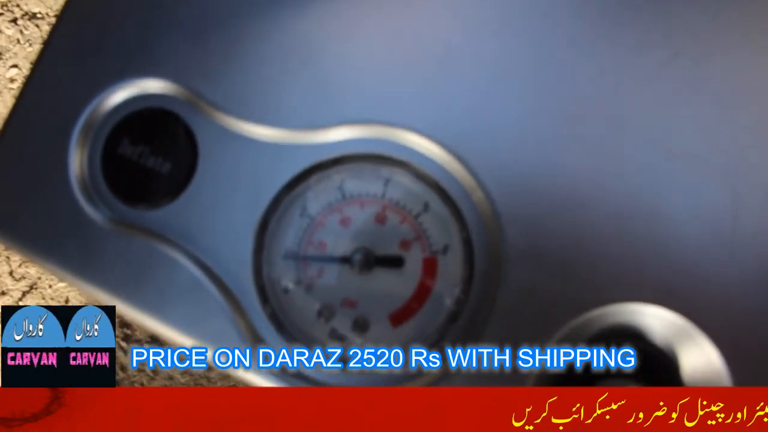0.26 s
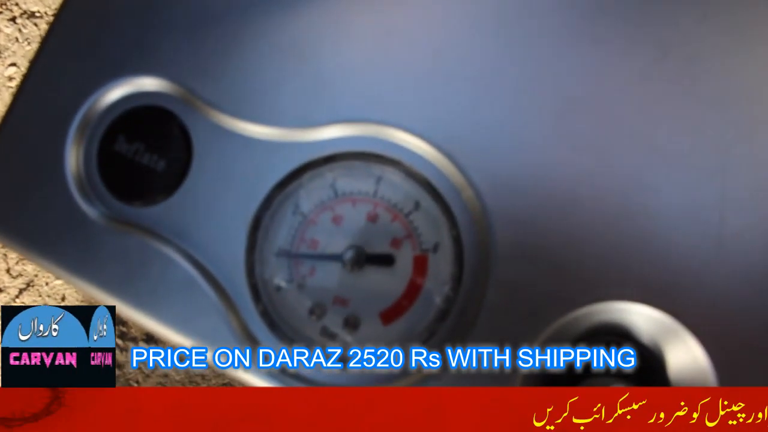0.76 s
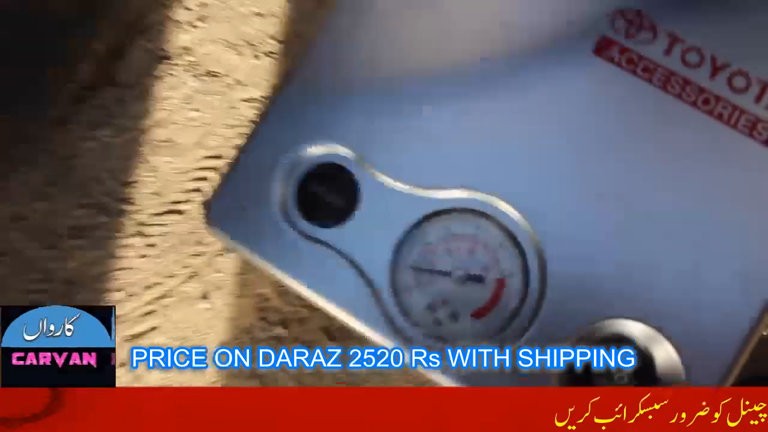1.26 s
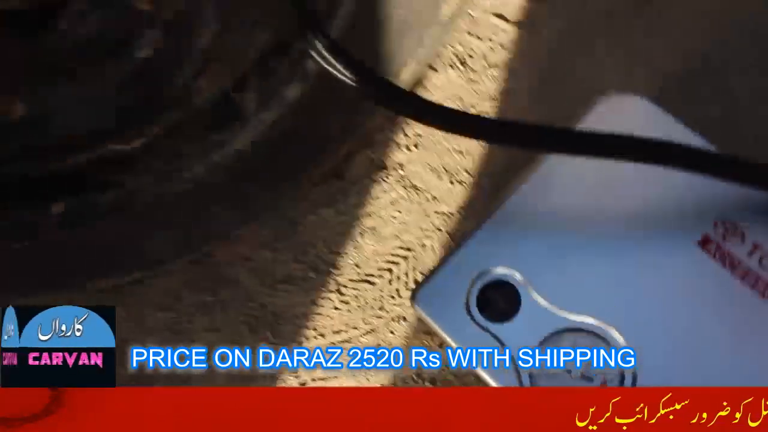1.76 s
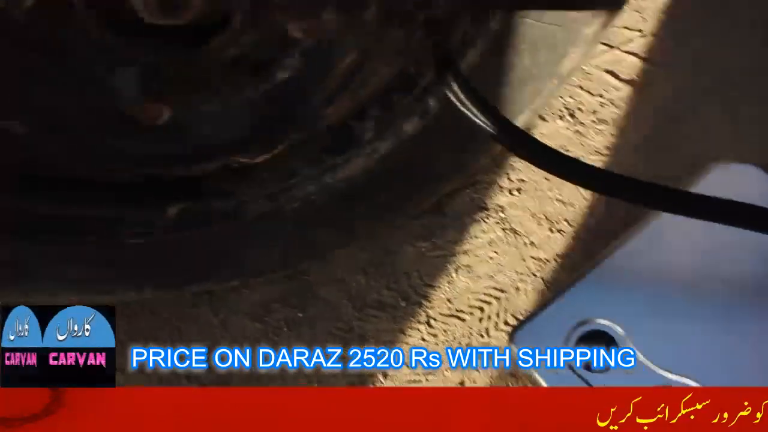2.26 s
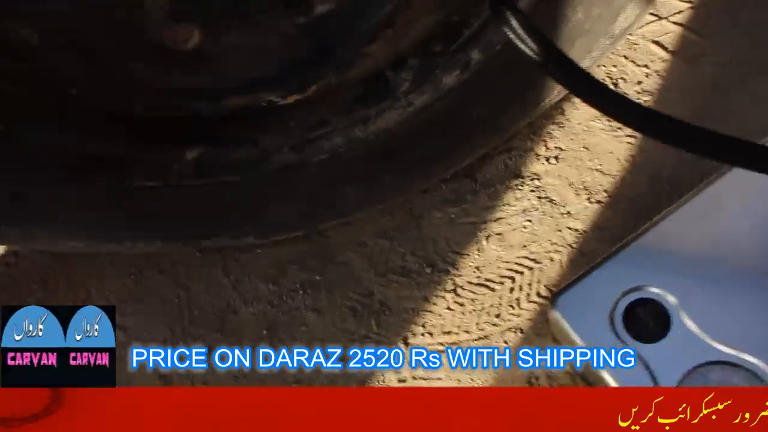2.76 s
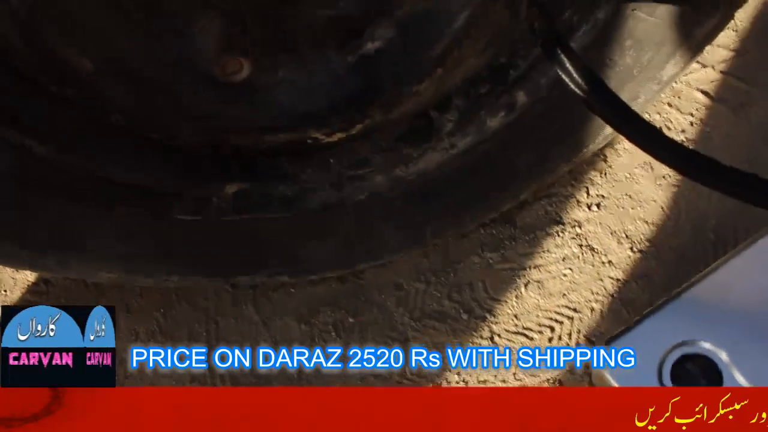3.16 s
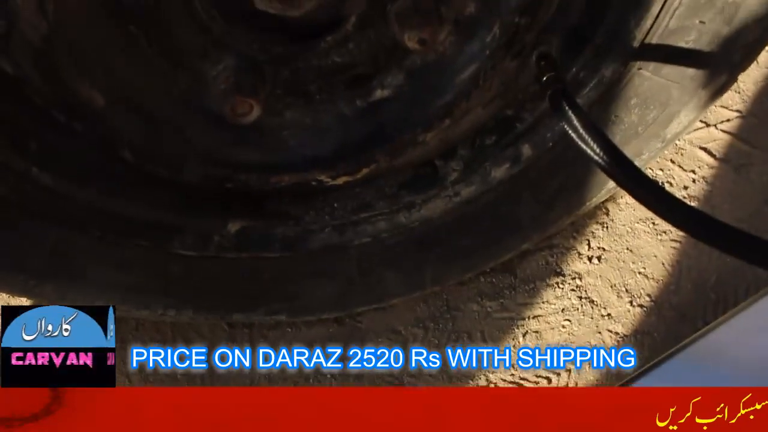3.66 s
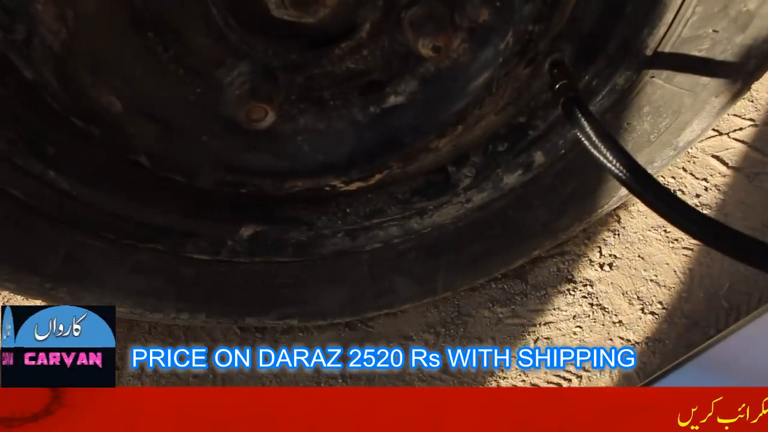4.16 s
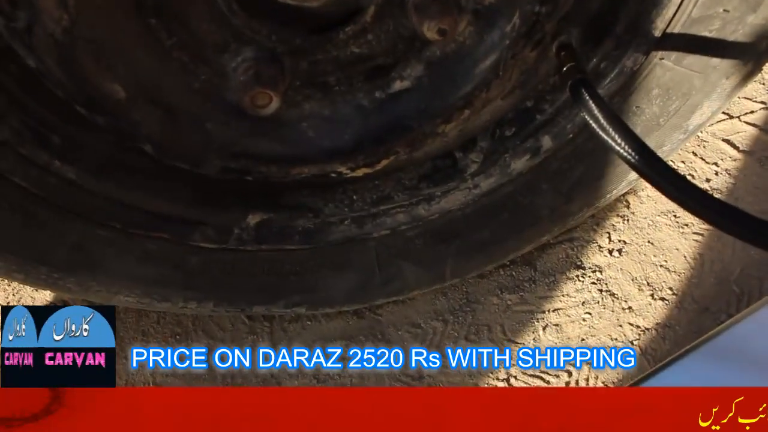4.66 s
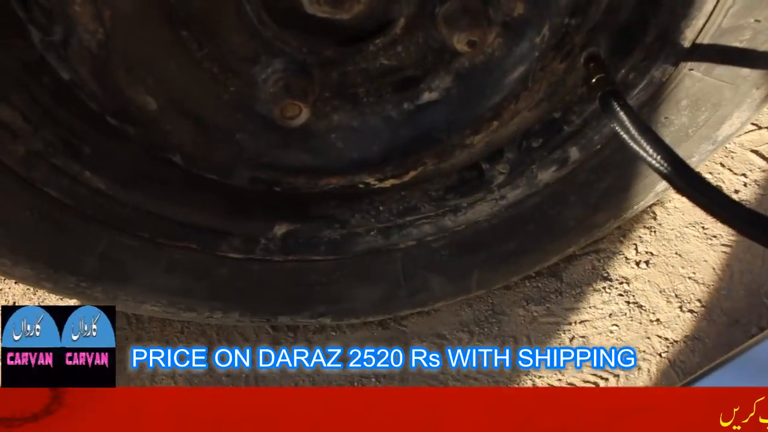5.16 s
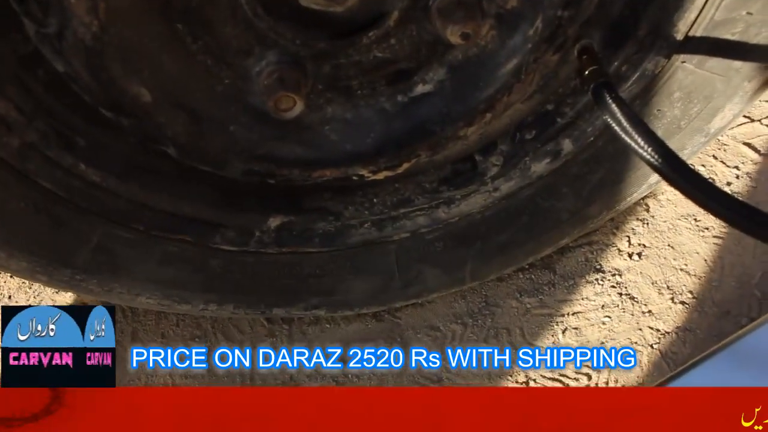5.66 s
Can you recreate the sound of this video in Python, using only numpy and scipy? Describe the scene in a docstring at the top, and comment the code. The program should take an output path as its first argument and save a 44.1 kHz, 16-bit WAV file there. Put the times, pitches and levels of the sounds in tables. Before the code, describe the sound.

A small electric tyre inflator runs throughout on the ground outdoors. Rapid piston strokes merge into a rough, nasal buzz around 500 hertz, with metallic gear clatter, tiny ticks and hissing air. The close microphone starts over the case, then drifts towards the wheel after about a second, so the tone changes colour and the rattle becomes slightly softer.

```python
"""On the ground beside a car wheel, a small piston tyre inflator pumps; the microphone moves
from above its case towards the wheel. At every stroke a reed valve flutters for a few cycles,
rings the air cavity and slaps the case. Ticks and clattering bursts of noise make crank and gears,
shaped noise makes the hissing air, and a faint wavering sine is the gear whine.
A steady low hum of a few sines and a rumble of filtered noise lie underneath."""
import sys
import numpy as np
from scipy import signal
from scipy.fft import rfft, irfft
from scipy.io import wavfile
from scipy.ndimage import uniform_filter1d

SR = 44100
rng = np.random.default_rng(int(sys.argv[2]) if len(sys.argv) > 2 else 0)


def unload_audio(sound):
    """Save the sound as a 16-bit wav file, at the path given as the first command line argument."""
    columns = np.transpose(np.atleast_2d(sound))
    # keep every value between -1 and 1, then stretch to whole-number steps
    steps = np.round(np.clip(columns, -1, 1) * 32767)
    wavfile.write(sys.argv[1], SR, steps.astype(np.int16))


N = 261072
T = np.arange(N) / SR  # time of every sample, s
FREQS = np.fft.rfftfreq(N, 1 / SR)  # Hz
GEAR_TEETH, PINION_TEETH = 60, 11

# A "place" says where the microphone is: 0 over the case, 1 at its edge, 2 by the wheel.


def undb(db):
    """Turn decibels into a gain."""
    return 10 ** (np.asarray(db) / 20)


def level(x, db=0):
    """Scale a sound to an average (rms) level in dB."""
    rms = np.sqrt(np.mean(x ** 2) + 1e-18)
    return x * undb(db) / rms


def curves(table):
    """Draw straight lines between the rows of a time table, for each of its columns."""
    seconds, *columns = np.transpose(table)
    return [np.interp(T, seconds, column) for column in columns]


def over_hz(points):
    """Join (Hz, value) points by straight lines on a logarithmic pitch axis."""
    hz, value = np.transpose(points)
    return np.interp(np.log(FREQS + 1), np.log(hz), value)


def shape(x, gain):
    """Colour a sound with one gain per frequency."""
    return irfft(rfft(x) * gain, N)


def resonate(x, hz, width):
    """Pass a sound through one resonance, with gain 1 at its centre; width in Hz."""
    return signal.lfilter(*signal.iirpeak(hz, hz / width, fs=SR), x)


def pan(x, db):
    """Spread a sound to both ears, the left one louder by db."""
    left = undb(db / 2) * np.ones(N)
    right = undb(-db / 2) * np.ones(N)
    return x * np.array([left, right])


def walk(rate):
    """Wander slowly at random around 0 with a spread near 1; rate in new values per second."""
    hold = int(SR / rate)
    steps = np.repeat(rng.standard_normal(N // hold + 2), hold)
    smooth = uniform_filter1d(uniform_filter1d(steps, hold), hold)
    return 1.35 * smooth[:N]


def taps(turn, angles, sizes, scatter_db, jitter_s):
    """Click at set crank angles in every turn, each click a little off in time and size."""
    chance = rng.standard_normal((int(turn[-1]) + 1, len(angles), 2))
    at_turn = np.arange(len(chance))[:, None] + angles
    seconds = np.interp(at_turn, turn, T, left=-1, right=-1) + jitter_s * chance[..., 0]
    index = (seconds * SR).astype(int)
    heights = sizes * undb(scatter_db * chance[..., 1])
    inside = (index >= 0) & (index < N)
    return np.bincount(index[inside], heights[inside], N)


def clear_of_lid(place):
    """Go smoothly from 0 right above the lid to 1 beside the case."""
    lid_end, blur = 0.76, .08  # as places
    return .5 + .5 * np.tanh((place - lid_end) / (2 * blur))


def in_beam(place):
    """Give 1 in the middle of the sound beam from the side wall, falling to 0 far outside it."""
    middle, half_width = 1.126, 0.27  # as places
    return np.exp(-((place - middle) / half_width) ** 2)


def reed(turn, rate, open_s=0.0095, start_hz=479, end_hz=597, skew=0.82, steep=1.29,
         beat_db=0.5, beat_turn=0.39, beat_lead_s=.00006, beat_stretch=0.054, scatter_db=0.4):
    """The valve flutters while open, rising in pitch; returns its tone and its slaps on the seat."""
    stroke = turn.astype(int)
    size, length, pitch, delay = rng.standard_normal((stroke[-1] + 1, 4))[stroke].T
    # the motor meets each stroke at another angle, so strong and weak,
    # early and late strokes nearly alternate
    motor = 2 * np.pi * (stroke * GEAR_TEETH / PINION_TEETH + beat_turn)
    push = np.cos(motor)
    age_s = (turn - stroke) / rate + beat_lead_s * np.cos(motor - 1.2) + .000025 * delay
    span_s = open_s * (1 + beat_stretch * push + 0.019 * length)
    # u runs from 0 at opening to 1 at closing
    u = np.clip(age_s / span_s, 0, 1)
    cycles = span_s * (1 + .006 * pitch) * (start_hz * u + (end_hz - start_hz) * u ** 2 / 2)
    swing = np.abs(np.sin(np.pi * u ** skew)) ** steep
    swing = swing * undb(beat_db * push + scatter_db * size)
    flutter = -np.sin(2 * np.pi * cycles)
    # the closing reed touches its seat once a cycle
    contact = swing * np.sqrt(u) * np.maximum(flutter, 0) ** 10
    slaps = np.diff(contact, prepend=0)
    return swing * flutter, slaps


def cavity(tone, share, place, ring_hz=523, ring_width=36, boom_hz=513, boom_width=12, boom=0.35,
           lid_hz=350, lid_width=70, lid_db=2):
    """The air cavity rings after each burst, more or less by place; a longer boom joins the strokes."""
    ring = share * resonate(tone, ring_hz, ring_width)
    ringing = tone + ring + boom * resonate(tone, boom_hz, boom_width)
    # the lid's low resonance only carries to a microphone above the case
    lid = resonate(resonate(tone, lid_hz, lid_width), lid_hz, 2 * lid_width)
    ringing = ringing + undb(lid_db) * np.maximum(1 - place, 0) * lid
    # even out the level over half a second
    return ringing / np.sqrt(uniform_filter1d(ringing ** 2, size=SR // 2))


def reed_voice(tone, place):
    """The flutter and its cavity ring together, as both ears hear them at this place."""
    clear = clear_of_lid(place)
    # the ring works against the reed over the lid (minus) and joins it beside the case (plus)
    ring_share = -0.46 * (1 - clear) + 0.98 * clear
    level_db = -20 + 1.2 * clear
    voice = cavity(tone, ring_share, place) * undb(level_db)
    # a quarter-cycle shifted copy, opposite in the two ears, puts them slightly out of step
    skewed = 0.21 * np.imag(signal.hilbert(voice)) * np.array([[1], [-1]])
    return pan(voice, -1.5) + skewed


def panels(slaps, place):
    """Slaps ring the case panels; past its edge the low one cancels and the higher ones carry."""
    # case panels: [f/Hz, width/Hz, left minus right/dB, level over the lid/dB,
    # level beside the case/dB, change in the beam/dB]
    panel_rings = [(1144, 63, -4.5, -35, -42.5, -11), (1759, 50, -5, -44, -44, 7),
                   (2375, 44, -5, -65, -49.5, 6.5)]
    clear, beam, out = clear_of_lid(place), in_beam(place), 0
    for hz, width, lean_db, over_db, beside_db, beam_db in panel_rings:
        ring = resonate(resonate(slaps, hz, width), hz, 6 * width)
        db = over_db * (1 - clear) + beside_db * clear + beam_db * beam
        out = out + pan(level(ring) * undb(db), lean_db)
    return out


def rattle(turn, place, teeth_db=-8.0, burst=1.16, burst_fade=0.18, ring_s=0.0041, contact_hz=3800):
    """Gear teeth clatter and air hisses, jumping up as the valve opens and fading through the turn."""
    # colour of rattle and hiss at the three places: [f/Hz, relative level/dB]
    over_case = [(450, -34), (800, 0), (1450, -8), (2000, -1.5), (2800, -2.5), (3200, -9), (3700, -9),
                 (5000, -11.5), (6000, -30.5), (7200, -17), (10000, -34), (15500, -48)]
    at_edge = [(450, -29), (800, -8), (1450, -6.5), (2000, -3.5), (2400, -4), (2650, -7.5), (3200, -7),
               (3700, -15.5), (5600, -12), (8000, -20.5), (10000, -29.5), (15500, -42.5)]
    by_wheel = [(450, -33), (800, -11.5), (1450, -6.5), (2050, -6.5), (2650, -3.5), (3150, -11),
                (3700, -14), (5000, -14), (6200, -21), (8000, -23), (10000, -28.5), (15500, -53)]
    # narrow resonances of the pump body:
    # [f/Hz, width/Hz, lift over the case/dB, lift at its edge/dB, lift by the wheel/dB]
    body_lifts = [(1245, 57, -1, 9, -2.5), (2200, 42, -14, 4, 8.5), (2567, 58, 10, -7, -11),
                  (2703, 17, 10, 1, 11), (3064, 100, 12.5, 0.5, 7.5), (4460, 210, 1, 1, 6.5),
                  (5260, 200, 6, -0.5, -11.5), (5420, 200, 0, 5.5, 12.5), (8340, 230, 1.5, 1, 4),
                  (10800, 410, 13, 3, 6.5)]
    # how alike the two ears hear it; below 0 counts as 0: [f/Hz, correlation/1]
    likeness = [(300, 0.62), (1400, 0.48), (2500, 0.51), (4500, 0.49), (6800, 0.63), (12000, -0.2)]
    # lean to one side: [f/Hz, left minus right/dB]
    side_lean = [(300, -5), (1300, -4.5), (2400, -2.5), (4400, -2.5), (8000, 0.5)]

    # push of the load, in turns since the valve opened
    since = (turn + 0.019) % 1
    force = undb(1.5 * rng.standard_normal(int(turn[-1]) + 2))[(turn + .03).astype(int)]
    load = 1 + force * burst * np.exp(-since / burst_fade) * (1 - np.exp(-since / 0.023))

    # random strengths and uneven angles, the same in every turn,
    # make a rough clatter without a clear pitch
    strengths = undb(3.5 * rng.standard_normal(GEAR_TEETH))
    angles = (np.arange(GEAR_TEETH) + rng.random(GEAR_TEETH)) / GEAR_TEETH
    teeth = taps(turn, angles, strengths, scatter_db=2.6, jitter_s=.00005)
    # each contact is a short push into a body that rings for a few milliseconds
    teeth = shape(teeth, 1 / (1 + (FREQS / contact_hz) ** 2))
    body = rng.standard_normal((2, SR // 50)) * np.exp(-T[:SR // 50] / ring_s)
    clatter = signal.fftconvolve(teeth[None], body, axes=1)[:, :N]
    hiss = rng.standard_normal((2, N))
    drive = load * (level(clatter, teeth_db) + hiss)

    # a shared part and an opposite part set how alike the ears are
    alike = np.clip(over_hz(likeness), 0, 1)
    mid = shape(drive[0], np.sqrt(1 + alike))
    side = shape(drive[1], np.sqrt(1 - alike))
    lean_db = over_hz(side_lean) / 2
    ear_gain = undb([lean_db, -lean_db]) / np.sqrt(1 + alike)
    ears = shape(np.array([mid + side, mid - side]), ear_gain)

    # blend the colours of the two nearest places
    out = 0
    for k, colour in enumerate([over_case, at_edge, by_wheel]):
        lifts_db = sum(lift[k] / (1 + (2 * (FREQS - hz) / width) ** 2)
                       for hz, width, *lift in body_lifts)
        coloured = level(shape(ears, undb(over_hz(colour) + lifts_db)))
        out = out + np.maximum(1 - np.abs(place - k), 0) * coloured
    # quieter once clear of the lid, and with distance
    place_db = -32 - 1.87 * clear_of_lid(place) - 1.22 * place
    return out * undb(.5 * walk(14)) * undb(place_db)


def knocks(turn):
    """Crank and rod take up their play with short dull ticks at the same angles in every turn."""
    # ticks: [crank angle/turn, f/Hz, width/Hz, level/dB]
    ticks = [(.01, 2060, 399, -51.5), (.135, 2026, 356, -46), (.29, 3100, 300, -59),
             (0.359, 2085, 350, -47.5), (0.792, 1896, 256, -51.5)]
    out = 0
    for angle, hz, width, db in ticks:
        hits = taps(turn, np.array([angle]), 1, scatter_db=2.5, jitter_s=.00006)
        ring = resonate(resonate(hits, hz, width), hz, 2 * width)
        out = out + level(ring, db)
    return pan(out, -3.5)


def rush(turn, place, db=-31.5, swell=0.14, near_db=2):
    """Turbulent air in the pump is noise, swelling with each stroke and loudest over the case."""
    # colour of the rushing air: [f/Hz, relative level/dB]
    air_colour = [(150, -23.5), (260, -14), (350, -13.5), (430, 3), (510, 1), (580, 1), (680, -7),
                  (740, -11.5), (820, -23.5), (1100, -29), (1500, -57)]
    air = rng.standard_normal(N) * (1 + swell * np.cos(2 * np.pi * (turn - .3)))
    coloured = level(shape(air, undb(over_hz(air_colour))), db)
    nearness = undb(near_db * np.maximum(1 - place, 0))
    return pan(coloured * nearness, -1.3)


def spit(turn, place, db=-61, edge_db=3.5, centre_hz=7500, width=6000, fade=0.096):
    """A bright jet of air escapes as the valve opens; it is loudest near the edge of the case."""
    since = (turn + 0.029) % 1  # turns since the jet began
    size = undb(2 * rng.standard_normal(int(turn[-1]) + 2))[(turn + .02).astype(int)]
    gate = size * np.exp(-since / fade) * (1 - np.exp(-since / .02))
    jet = resonate(rng.standard_normal((2, N)), centre_hz, width) * gate
    softened = shape(jet, 1 / (1 + (FREQS / 11000) ** 4))
    nearness = undb(edge_db * np.maximum(1 - np.abs(place - .8), 0))
    return level(softened, db) * nearness


def vent(turn, place, db=-66, centre_hz=13500, width=3500, aim=.93, spread=.22, swell=.5):
    """A thin high hiss leaves the case in a narrow beam, pulsing with the strokes."""
    air = rng.standard_normal((2, N)) * (1 + swell * np.cos(2 * np.pi * (turn - .1)))
    hiss = resonate(resonate(air, centre_hz, width), centre_hz, 2 * width)
    # the microphone passes through the beam; aim and spread are places
    return level(hiss, db) * np.exp(-((place - aim) / spread) ** 2)


def whine(turn, db=-55.5):
    """The meshing gears sing faintly, one cycle per tooth, wavering in pitch and level."""
    mesh = np.sin(2 * np.pi * GEAR_TEETH * turn + 1.2 * walk(12))
    return pan(level(mesh * undb(2.5 * walk(6)), db), -3)


def background(hum_hz=40.45, rumble_db=-48):
    """A steady low hum of a few sines lies over outdoor rumble made of filtered noise."""
    # lines of the hum: [multiple of hum_hz/1, level/dB]
    hum_lines = [(2, -46.5), (3, -59), (4, -56), (7, -48)]
    # colour of the outdoor rumble: [f/Hz, relative level/dB]
    rumble_colour = [(20, -7.5), (45, -2), (70, 1), (100, 1.5), (140, 4), (200, -1), (300, -16.5),
                     (600, -24), (1500, -64)]
    phase = 2 * np.pi * hum_hz * T + 0.039 * walk(1.7)
    hum = sum(level(np.sin(round(k) * phase + rng.uniform(0, 2 * np.pi)), db) for k, db in hum_lines)
    mid, side = shape(rng.standard_normal((2, N)), undb(over_hz(rumble_colour)))
    # the weaker side part is opposite in the two ears
    width = level(side, rumble_db - 18.0) * np.array([[1], [-1]])
    return hum + level(mid, rumble_db) + width


def scene():
    """One crank drives every part of the pump; the microphone's place sets how parts are heard."""
    # the crank slows as the tyre fills: [t/s, speed/(strokes per s)]
    crank = [(0, 32.039), (.5, 31.81), (1.1, 31.359), (3, 31.267), (5.92, 31.05)]
    # the microphone lingers, then glides towards the wheel: [t/s, place/1]
    path = [(0, .5), (1.15, 0.57), (1.9, 1.04), (3.7, 1.58), (5.92, 1.7)]
    rate, = curves(crank)
    turn = .146 + np.cumsum(rate) / SR  # crank turns so far, from the starting angle
    place = np.clip(curves(path)[0], 0, 2)
    tone, slaps = reed(turn, rate)
    valve = reed_voice(tone, place) + panels(slaps, place)
    gears = rattle(turn, place) + knocks(turn) + whine(turn)
    air = rush(turn, place) + spit(turn, place) + vent(turn, place)
    return valve + gears + air + background()


def record(dry):
    """A steep low-pass filter leaves no treble above 15800 Hz."""
    return signal.sosfilt(signal.ellip(8, .2, 70, 15800, fs=SR, output="sos"), dry)


dry = scene()
out = record(dry)
unload_audio(out)
```